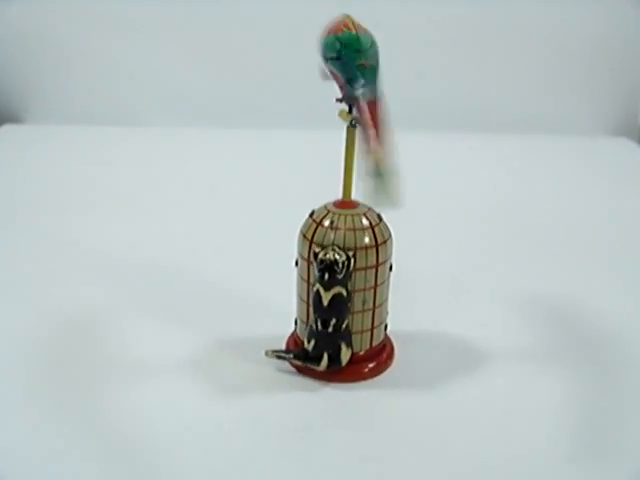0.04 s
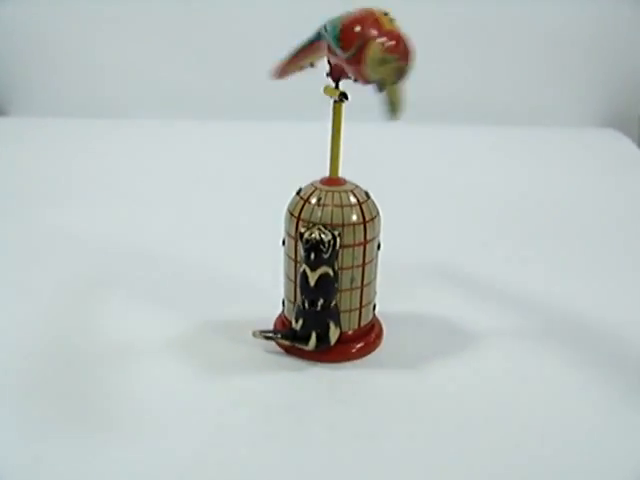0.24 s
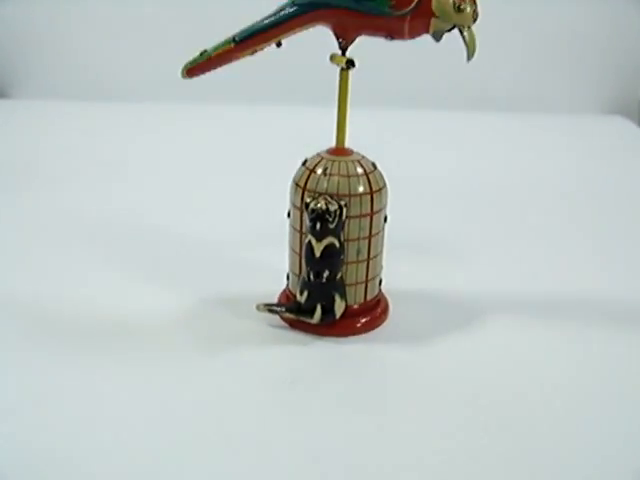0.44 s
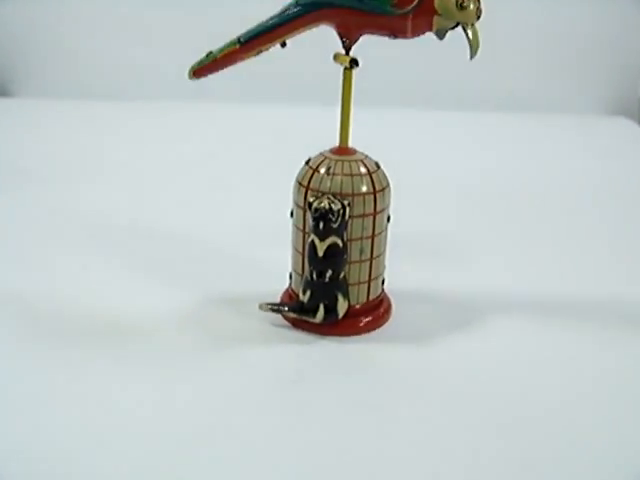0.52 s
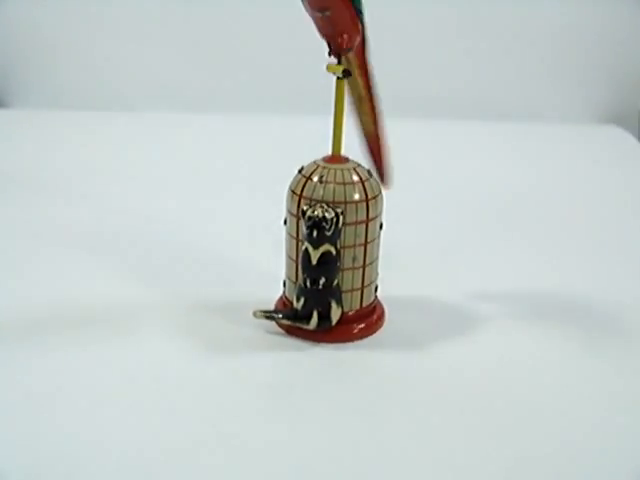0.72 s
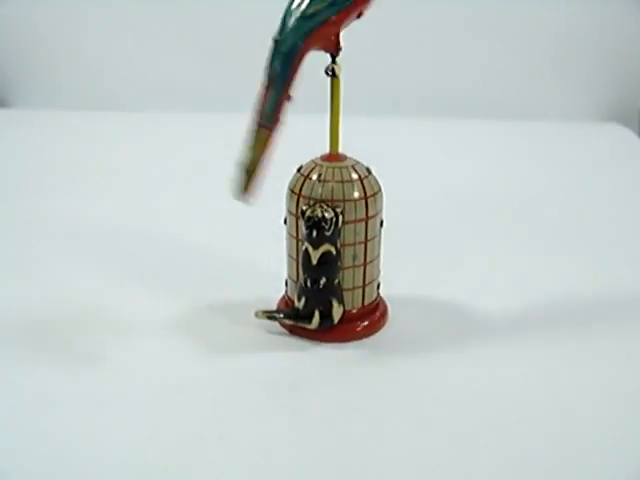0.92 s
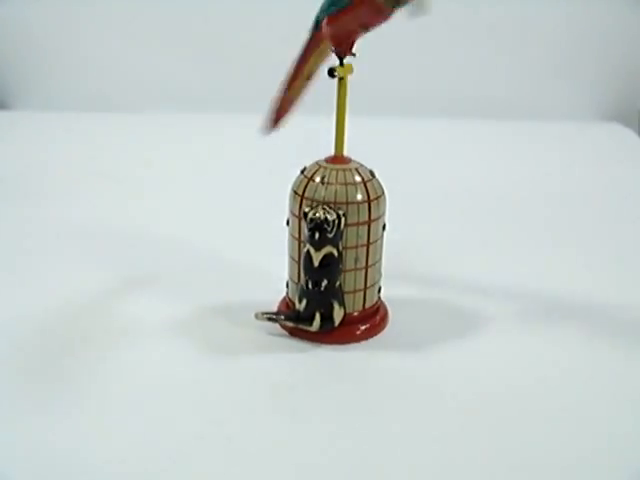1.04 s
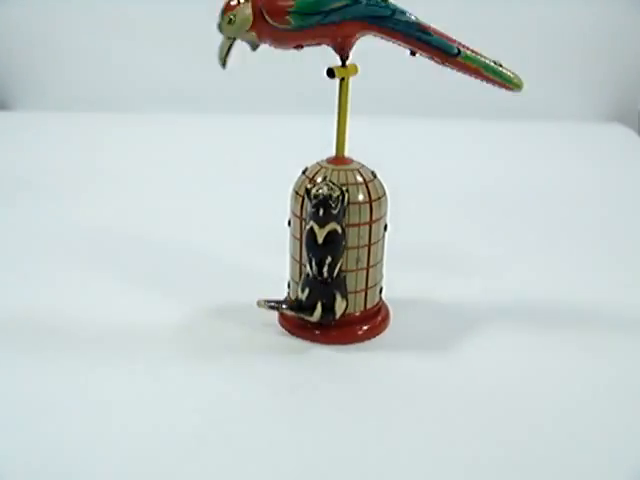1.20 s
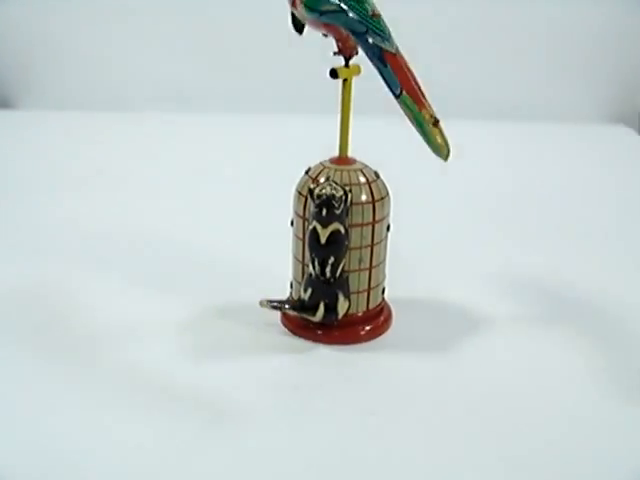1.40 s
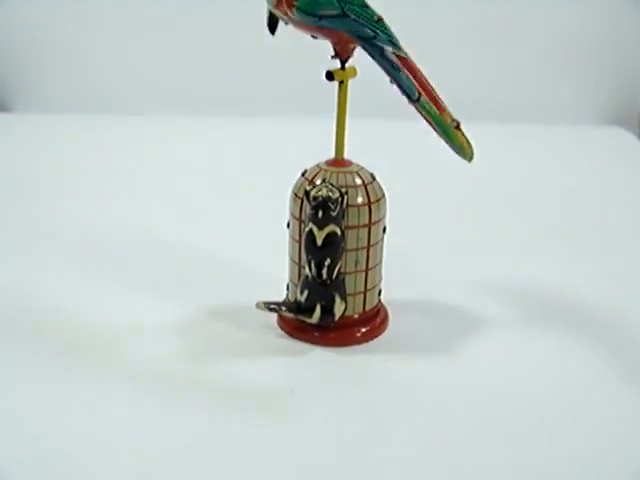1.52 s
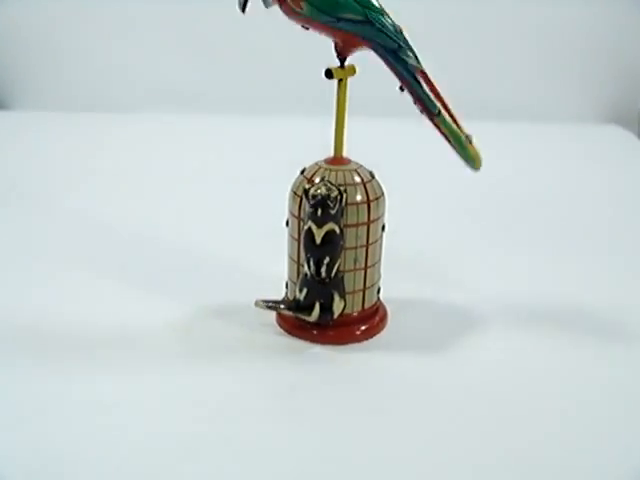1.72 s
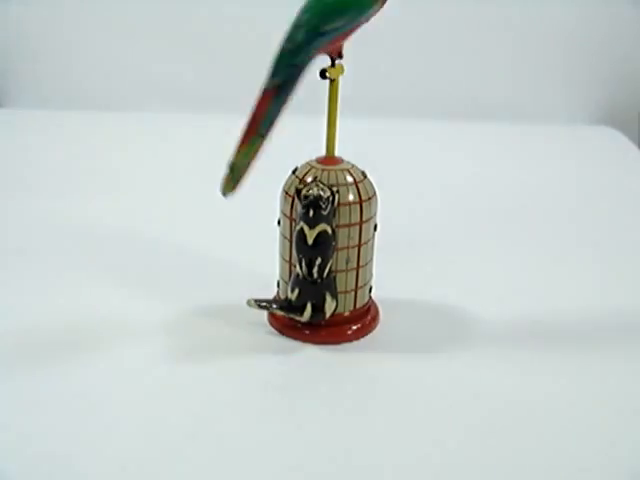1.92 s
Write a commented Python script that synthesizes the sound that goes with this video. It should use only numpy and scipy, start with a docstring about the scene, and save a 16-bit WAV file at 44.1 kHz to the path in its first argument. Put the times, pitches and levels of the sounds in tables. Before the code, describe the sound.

A tin wind-up toy clacks and rattles in two quick flurries on a table.

```python
"""A tin wind-up parrot tumbles on its perch, clacking and rebounding in two flurries.
Each hit makes its thin shell ring, and its loose parts rattle in and between the flurries.
The base taps and knocks down once on the table, whose top thrums as the toy's weight shifts.
The clockwork whirs faintly. It all happens close by, in a small room that hisses underneath."""
import sys
import numpy as np
from scipy import signal
from scipy.fft import rfft, irfft, next_fast_len
from scipy.io import wavfile
from scipy.ndimage import uniform_filter1d, map_coordinates

SR = 44100
rng = np.random.default_rng(int(sys.argv[2]) if len(sys.argv) > 2 else 0)


def dump(signal):
    """Clip the signal to [-1, 1] and save it as 16-bit WAV at the path in sys.argv[1]."""
    limited = np.clip(np.atleast_2d(signal).T, -1, 1)
    pcm = np.round(limited * 32767).astype(np.int16)
    wavfile.write(sys.argv[1], SR, pcm)


N = 85995
T = np.arange(SR // 2) / SR  # half a second of time for each short sound
TOP_HZ, STRIKE_RISE_S = 10080, 0.00049  # treble limit; how fast a clack or clink starts


# Tone colour of a clack, or how strong each frequency is: f/Hz, level/dB
CLACK_COLOUR = [(40, -24.5), (250, -16.5), (820, -22), (1100, -5.5), (1350, -10.5), (1850, -2),
                (2700, -4.5), (3600, -2.5), (4700, -5), (5900, -9), (7200, -1.5), (9000, -7.5),
                (9900, -11.5)]
# The bird's main hits: t/s, level/dB, low boost/dB, treble boost/dB, fade time/s, snap/dB,
# resonance boost/dB, then three resonances of the spot struck, each f/Hz
CLACKS = [(0.2188, -14, 2, 0, 0.044, 9.5, 14.9, 1987, 2410, 2750),
          (0.2517, -12.5, 0.5, -6.5, .042, -1.5, 8.6, 1496, 1800, 2790),
          (0.2987, -17, 4.5, -2, 0.048, 6, 6.7, 1080, 1970, 3490),
          (0.3543, -16, 4.5, 0.5, 0.036, 5.5, 9.6, 1107, 2550, 3480),
          (0.438, -15.5, 1, -1.5, .032, 0, 8.2, 1793, 2710, 3960),
          (1.2214, -18.5, 0.5, -1, 0.037, 11, 5, 2220, 3600, 8900),
          (1.2623, -19.5, 2.5, 1, .04, 9.5, 6.3, 2190, 4230, 6650),
          (1.3242, -16.5, 1, -3.5, 0.034, 6.5, 7.3, 2130, 3340, 8940),
          (1.4192, -17, 2.5, -1.5, 0.032, 3.5, 6.6, 1750, 2270, 2640)]
def clacks(clank_hz=1059, snap_fade_s=0.0078, spread_fade_s=0.069):
    """The bird hits its stops, tin on tin: it snaps, clatters and clanks, and loose parts jiggle."""
    out = np.zeros(N)
    for start, db, low_db, treble_db, fade_s, snap_db, peak_db, *peaks_hz in CLACKS:
        envelope = rise(STRIKE_RISE_S) * (fade(fade_s) + amp(snap_db) * fade(snap_fade_s))
        peaks = [resonance(hz, peak_db) for hz in peaks_hz]
        low_boost = [(1200, low_db), (2600, 0)]
        colour = [CLACK_COLOUR, *peaks, low_boost, treble_boost(treble_db)]
        clank = amp(-21.5 + low_db) * fade(0.041) * sine(clank_hz)  # the body's lowest strong note
        shaking = chattering(fade(0.33), contacts_per_s=450, depth=0.65)
        jiggle = amp(-22.5) * burst(shaking, RATTLE_COLOUR)
        direct = burst(envelope, *colour) + clank + amp(-18.5) * shell_ring() + jiggle
        toward_walls = burst(match_energy(fade(spread_fade_s), envelope), *colour)
        add(out, start, amp(db) * room(direct, toward_walls))
    return out


# The notes of the tin shell: f/Hz, level/dB, fade time/s
SHELL_NOTES = [(1070, 0.5, 0.12), (1534, -1.5, 0.22), (1774, 5.5, 0.26), (1990, 0, 0.22), (2040, -7, 0.16),
               (2467, 3.5, 0.25), (2740, 5, 0.13), (3614, 2.5, 0.22), (3610, -5.5, 0.16), (3900, 0.5, 0.25),
               (6760, -1, 0.084)]
def shell_ring(scatter_db=3, detune=0.0029):
    """The shell rings with several notes at once, in a new balance at each hit."""
    hz, db, fade_s = np.transpose(SHELL_NOTES)
    level_scatter, pitch_scatter = rng.standard_normal((2, len(hz)))
    gains = amp(db + scatter_db * level_scatter)
    cycles = np.outer(hz * (1 + detune * pitch_scatter), T) + rng.random((len(hz), 1))
    notes = np.sin(2 * np.pi * cycles) * fade(fade_s[:, None])
    return np.sqrt(2) * gains / np.linalg.norm(gains) @ notes


# Tone colour of light tin contacts: f/Hz, level/dB
RATTLE_COLOUR = [(200, -13.5), (1300, -8.5), (1900, 1), (2700, -2.5), (3500, 1.5), (5200, -5.5),
                 (7300, -5.5), (9800, -14.5)]
# The bird's small rebounds and lighter clacks, and the rattles of its loose parts:
# t/s, level/dB, treble boost/dB, fade time/s, strongest resonance f/Hz
REBOUNDS_AND_RATTLES = [(.0875, -31, 1, 0.015, 2370), (0.2318, -25.5, -1, 0.017, 1564),
                        (0.2398, -22.5, -1.5, 0.034, 1994), (0.2623, -29, -19, 0.023, 1820),
                        (.2675, -24, -9, .03, 3460), (0.277, -25.5, -15, 0.028, 2000),
                        (.3229, -20.5, -8, 0.021, 3530), (.379, -28, 0, 0.071, 3350),
                        (0.428, -40, -14, .06, 2700), (.459, -33.5, 5.5, 0.14, 6700),
                        (0.7938, -34.5, 5, .038, 2790), (0.845, -37.5, -11, 0.082, 1970),
                        (0.8738, -29, 2, 0.08, 2380), (0.8893, -20.5, 1.5, 0.031, 2510),
                        (0.9238, -27.5, -20, 0.079, 1970), (.932, -22.5, 5.5, 0.028, 4380),
                        (0.978, -32.5, 1.5, 0.11, 2970), (1.0033, -28, 1, 0.023, 3210),
                        (1.0351, -28.5, 11, 0.037, 3597), (1.0489, -27, -1, .022, 2190),
                        (1.1217, -26.5, 3, 0.056, 4190), (1.1312, -19.5, -1, .025, 1830),
                        (1.1601, -23.5, 4.5, 0.037, 3310), (1.1675, -22.5, 5, 0.033, 3345),
                        (1.176, -32, -27, 0.057, 5300), (1.233, -28, -14, 0.02, 3620),
                        (1.2451, -18.5, -14.5, 0.037, 3700), (1.2562, -19.5, 8, 0.039, 6800),
                        (1.352, -29, 5.5, 0.066, 3420), (1.523, -35.5, 0, 0.021, 2430),
                        (1.919, -31.5, -8, 0.018, 2280)]
def rebounds_and_rattles():
    """Each small rebound, light clack or rattle is a cluster of tiny contacts with a brief ping."""
    out = np.zeros(N)
    onset = rise(0.00065)
    for start, db, treble_db, fade_s, hz in REBOUNDS_AND_RATTLES:
        envelope = chattering(onset * fade(fade_s), contacts_per_s=640)
        clatter = burst(envelope, RATTLE_COLOUR, resonance(hz, db=7), treble_boost(treble_db))
        ping = amp(-11) * onset * fade(0.05) * sine(hz)
        add(out, start, amp(db) * room(clatter + ping + amp(-19) * shell_ring()))
    return out


# The notes of a small steel link: f/Hz, level/dB, fade time/s
LINK_NOTES = [(1745, -8.5, 0.061), (2046, 2, 0.028)]
def small_parts(clink_at_s=1.1315, linger_at_s=0.438):
    """A link clinks once, and one part of the tin keeps singing after the first flurry."""
    out = np.zeros(N)
    clink = struck(LINK_NOTES) * rise(STRIKE_RISE_S)
    add(out, clink_at_s, amp(-18.5) * room(clink))
    lingering = amp(-53) * sine(735) * fade(1.6)
    soft_ending = np.cos(np.pi / 2 * T / T[-1])
    add(out, linger_at_s, lingering * soft_ending)
    return out


# Tin sliding on tin: t/s, length/s, level/dB, squeak f/Hz
SCRAPES = [(1.264, .046, -30, 5200)]
def scrapes():
    """One tin edge slips over another in quick little jerks, with a thin squeak."""
    out = np.zeros(N)
    for start, length, db, hz in SCRAPES:
        stroke = np.sin(np.pi * np.minimum(T / length, 1))
        slips = chattering(stroke, contacts_per_s=900)
        squeak = resonance(hz, db=16, octaves=0.05)
        add(out, start, amp(db) * room(burst(slips, RATTLE_COLOUR, squeak)))
    return out


# The base's dull taps, its one drop, and the shifts of weight on the table: t/s, level/dB
TAPS = [(0.8273, -35.5), (0.913, -34.5), (.976, -42), (1.389, -32), (1.604, -44), (1.665, -32),
        (1.863, -37)]
KNOCKS = [(1.4153, -18.5)]
WEIGHT_SHIFTS = [(0.22, -42.5), (0.255, -37), (0.341, -44.5), (0.809, -46), (.911, -36), (0.974, -43),
                 (1.107, -35), (1.224, -44), (1.416, -40)]
# Tone colours of a tap and a knock: f/Hz, level/dB
TAP_COLOUR = [(100, -13), (350, -9), (600, 4.5), (1150, 5.5), (2200, -3), (4000, -22), (9800, -24)]
KNOCK_COLOUR = [(40, -19), (150, -2), (230, -2), (340, 5), (440, -2.5), (600, 5.5), (740, -2.5), (900, 6),
                (1300, -1), (2300, -9), (4000, 4), (7000, -5.5), (9800, -37)]
# The low notes of the table top: f/Hz, level/dB, fade time/s
TABLE_NOTES = [(132.5, -1.5, 0.22), (160, -4, 0.13), (231, -7, 0.2), (320.3, -4.5, 0.092)]
def base_on_table():
    """The base taps and knocks on the table, whose top thrums as the weight shifts."""
    out = np.zeros(N)
    for start, db in TAPS:
        add(out, start, amp(db) * burst(fade(0.02), TAP_COLOUR))
    for start, db in KNOCKS:
        envelope = fade(0.024)
        push = match_energy(coloured(fade(0.00039), KNOCK_COLOUR), envelope)
        scuff = amp(-6) * burst(envelope, KNOCK_COLOUR)
        add(out, start, amp(db) * (push + scuff))
    thrum = struck(TABLE_NOTES) * rise(0.0062)
    for start, db in WEIGHT_SHIFTS:
        add(out, start, amp(db) * thrum)
    return out


# Tone colour of the gears: f/Hz, level/dB
WHIR_COLOUR = [(80, -25), (170, 3.5), (350, 4.5), (800, -6), (2000, 1.5), (3500, -5.5), (5500, -14),
               (9800, -20)]
# How the whir swells and sinks: t/s, level/dB
WHIR_LEVELS = [(0, -47), (.17, -46), (.45, -57), (.6, -75), (.78, -79), (.9, -53.5), (1.35, -48),
               (1.56, -88), (1.8, -58), (1.87, -45.5), (1.95, -62)]
def clockwork(rough_db=3, flutter_per_s=150):
    """Small gears turn with a faint, uneven whir."""
    t = np.arange(N) / SR
    flutter = map_coordinates(rng.standard_normal(N // 20), [t * flutter_per_s], mode="wrap")
    rough_noise = rng.standard_normal(N) * amp(rough_db * flutter)
    level_db = np.interp(t, *np.transpose(WHIR_LEVELS))
    return amp(level_db) * unit(coloured(rough_noise, WHIR_COLOUR))


# How long the room echoes: f/Hz, fade time/s
ECHO_FADES = [(150, 0.83), (1000, 0.62), (3000, 0.34), (9000, 0.057)]
def room(direct, toward_walls=None, echo_db=-20.5, delay_s=0.0046):
    """The walls add a soft echo of what reaches them, by default the direct sound itself."""
    hz, t, spectrum = signal.stft(rng.standard_normal(len(T)), SR, nperseg=256)
    decay = np.exp(-np.log(1000) * t / along(ECHO_FADES, hz)[:, None])
    tail = signal.istft(spectrum * decay, SR, nperseg=256)[1]
    tail = np.pad(tail, (round(delay_s * SR), 0))
    source = direct if toward_walls is None else toward_walls
    echo = signal.fftconvolve(source, tail / np.linalg.norm(tail))[:len(direct)]
    return direct + amp(echo_db) * echo


# Tone colours of the room's hiss and rumble: f/Hz, level/dB
HISS_COLOUR = [(25, -19), (60, -30), (90, -11.5), (140, -0.5), (300, 2.5), (500, -2.5), (1000, -5.5),
               (2000, -3), (3200, -10.5), (5000, -18), (9800, -22.5)]
RUMBLE_COLOUR = [(25, -28), (45, -28), (58, 17), (75, -10), (120, -36), (500, -75.5)]
def background():
    """The room hisses steadily over a faint low rumble."""
    hiss = amp(-51.5) * unit(coloured(rng.standard_normal(N), HISS_COLOUR))
    rumble = amp(-75) * unit(coloured(rng.standard_normal(N), RUMBLE_COLOUR))
    return hiss + rumble


def burst(envelope, *curves):
    """A clatter of noise with the shape and energy of the envelope (its loudness over time)."""
    spectrum = rfft(envelope * rng.standard_normal(len(T)))
    power = np.abs(uniform_filter1d(np.abs(spectrum) ** 2, size=260))
    even_noise = irfft(spectrum / np.sqrt(power + 1e-12), len(T))  # evens out chance peaks
    first_half = T < T[-1] / 2
    return match_energy(coloured(even_noise * first_half, *curves), envelope)


def chattering(envelope, contacts_per_s, depth=0.63):
    """Break an envelope into tiny random contacts, keeping its energy."""
    contacts = (rng.random(len(T)) < contacts_per_s / SR).astype(float)
    grain = unit(signal.fftconvolve(contacts, fade(0.0042))[:len(T)])
    return match_energy(envelope * (1 - depth + depth * grain), envelope)


def coloured(x, *curves):
    """Shape a sound's tone with the sum of some (f/Hz, level/dB) curves."""
    size = 2 * next_fast_len(len(x))
    hz = np.fft.rfftfreq(size, 1 / SR)
    top_cut = np.where(hz < TOP_HZ + 500, 1, 0.05)
    gain = unit(amp(sum(along(curve, hz) for curve in curves)) * top_cut)
    # These steps make the filter ring only after a hit, never before it.
    cepstrum = irfft(np.log(gain + 1e-6))
    cepstrum[1:size // 2] *= 2
    cepstrum[size // 2 + 1:] = 0
    return irfft(rfft(x, size) * np.exp(rfft(cepstrum)))[:len(x)]


def resonance(hz, db, octaves=0.14):
    """A curve with one peak, sloping away over `octaves` on each side."""
    edge = 2 ** octaves
    return [(hz / edge, 0), (hz, db), (hz * edge, 0)]


def treble_boost(db):
    """A curve that turns the highs up, or down if db is negative."""
    return [(3200, 0), (7100, db)]


def along(points, hz):
    """Read a curve between its points, on a scale of pitch."""
    freqs, values = np.transpose(points)
    return np.interp(np.log(hz + 1), np.log(freqs + 1), values)


def struck(notes):
    """A struck object: its notes start together and each fades at its own pace."""
    return sum(amp(db) * sine(hz) * fade(fade_s) for hz, db, fade_s in notes)


def sine(hz):
    """A pure tone."""
    return np.sin(2 * np.pi * hz * T)


def rise(seconds):
    """Climb from 0 toward 1, getting about two thirds of the way in this time."""
    return 1 - np.exp(-T / seconds)


def fade(seconds):
    """Die away, dropping 60 dB in this fade time."""
    return np.exp(-np.log(1000) * T / seconds)


def amp(db):
    """Turn decibels into a multiplier."""
    return 10 ** (np.asarray(db) / 20)


def unit(x):
    """Scale to an average power of 1."""
    return x / np.sqrt(np.mean(x ** 2) + 1e-20)


def match_energy(x, target):
    """Scale x to carry as much energy as the target."""
    return x * np.linalg.norm(target) / np.linalg.norm(x)


def add(track, start, sound):
    """Mix a sound into the track, `start` seconds in."""
    part = track[round(start * SR):][:len(sound)]
    part += sound[:len(part)]


def scene():
    """The toy on its table in the room, in one channel."""
    bird = clacks() + rebounds_and_rattles() + small_parts() + scrapes()
    return (bird + room(base_on_table()) + clockwork() + background())[None]


def record(dry):
    """Cut away the treble above TOP_HZ."""
    size = next_fast_len(N + SR // 2)
    hz = np.fft.rfftfreq(size, 1 / SR)
    low_pass = np.clip((TOP_HZ - hz) / 200 + 0.5, 0, 1)
    return irfft(rfft(dry, size) * low_pass, size)[..., :N]


dry = scene()
out = record(dry)
dump(out)
```